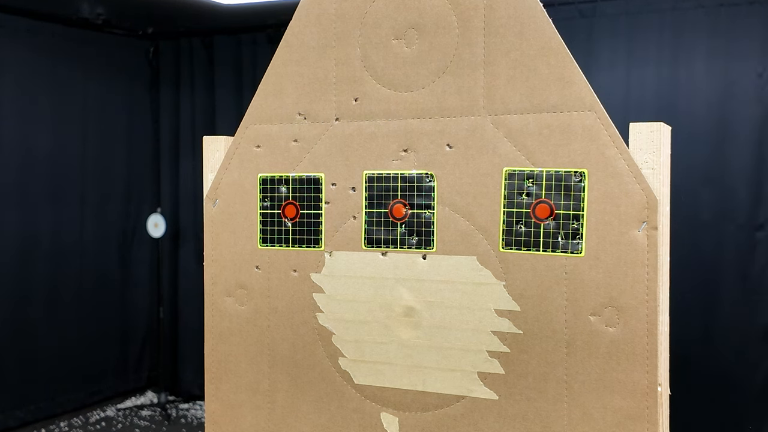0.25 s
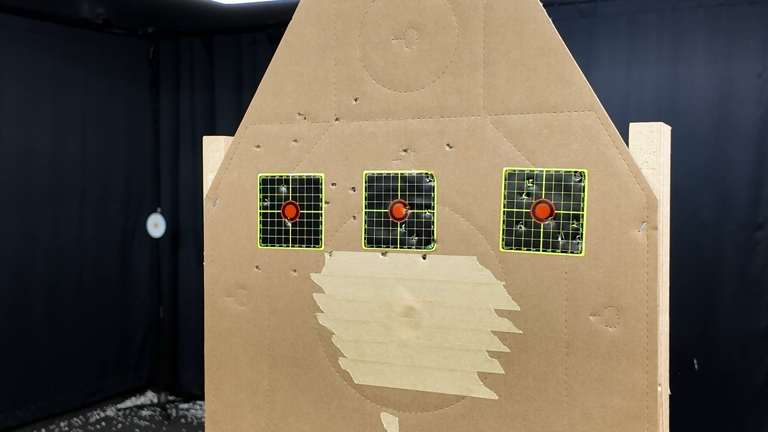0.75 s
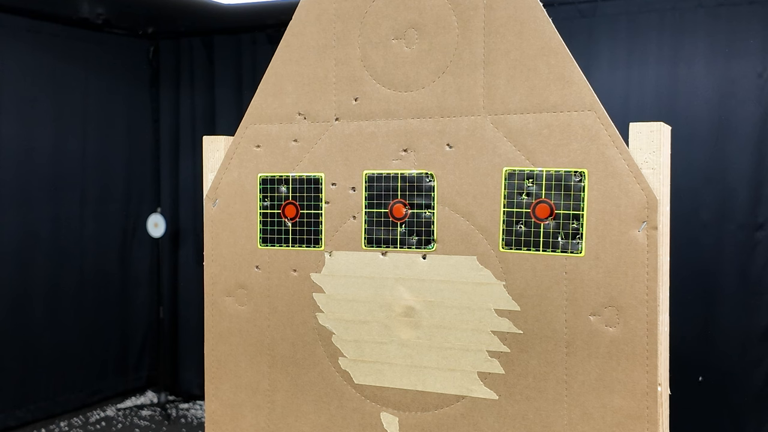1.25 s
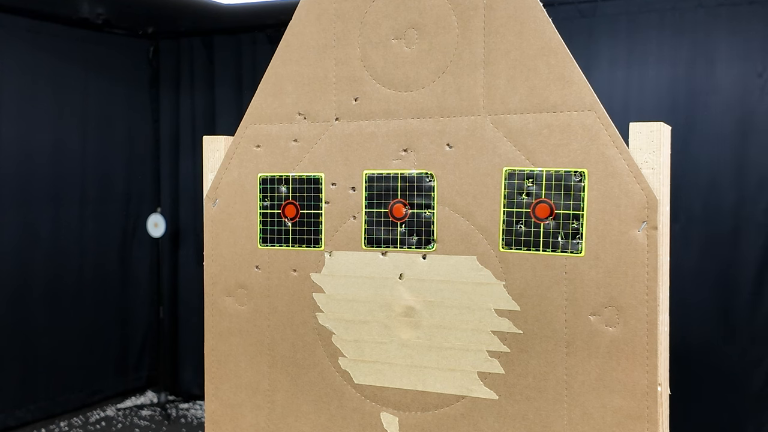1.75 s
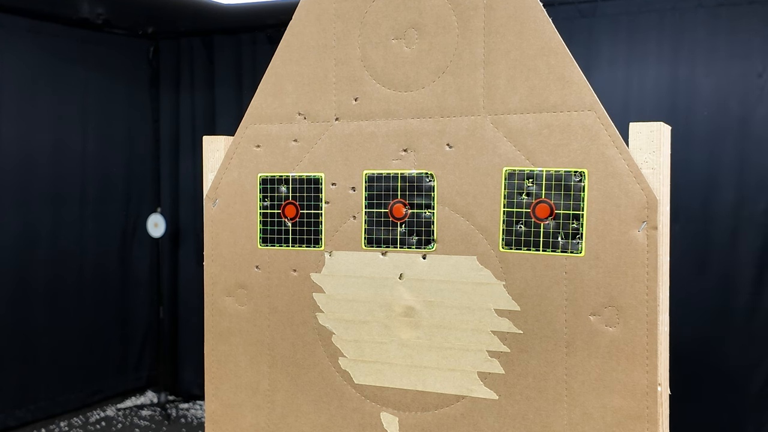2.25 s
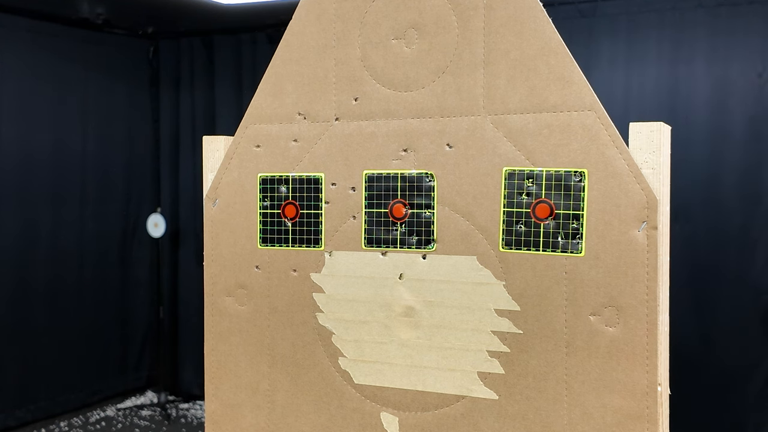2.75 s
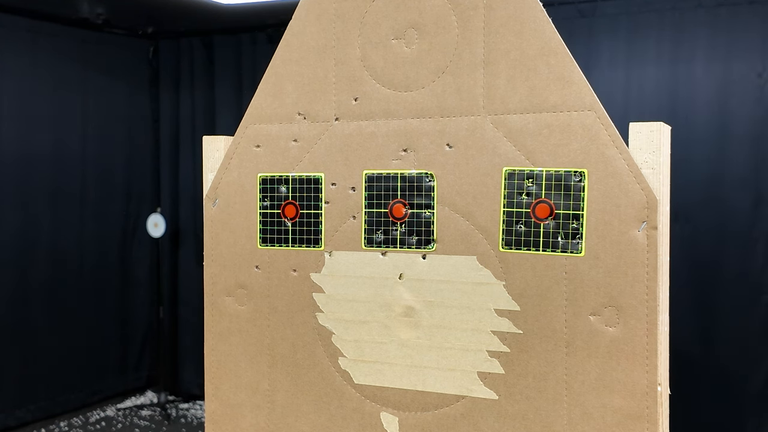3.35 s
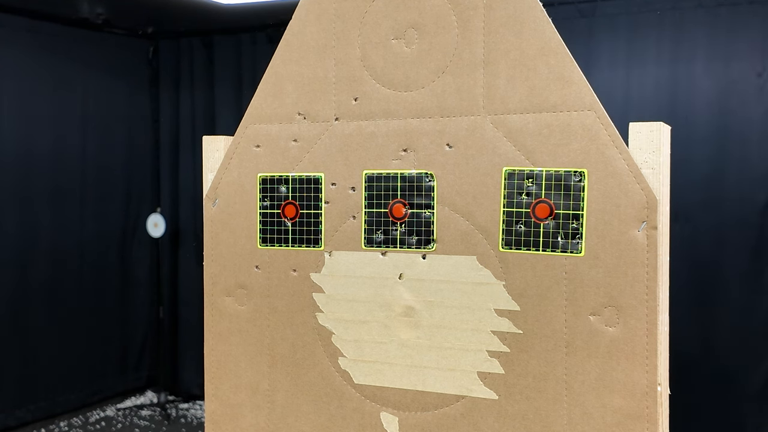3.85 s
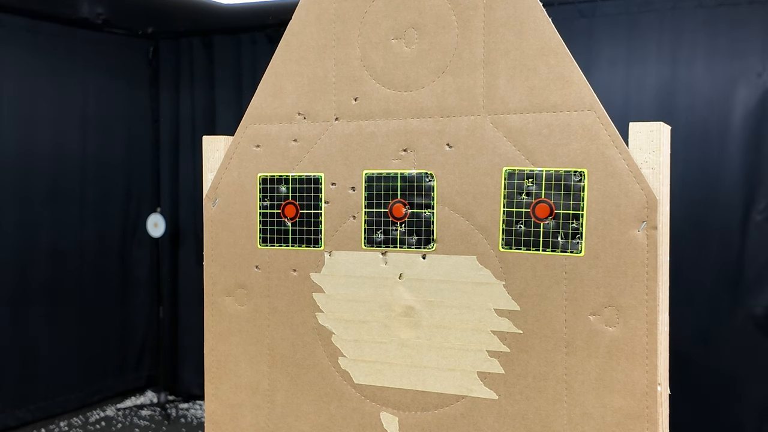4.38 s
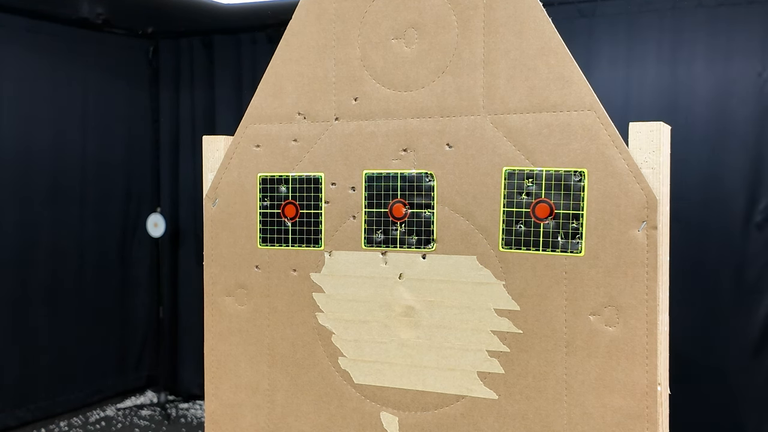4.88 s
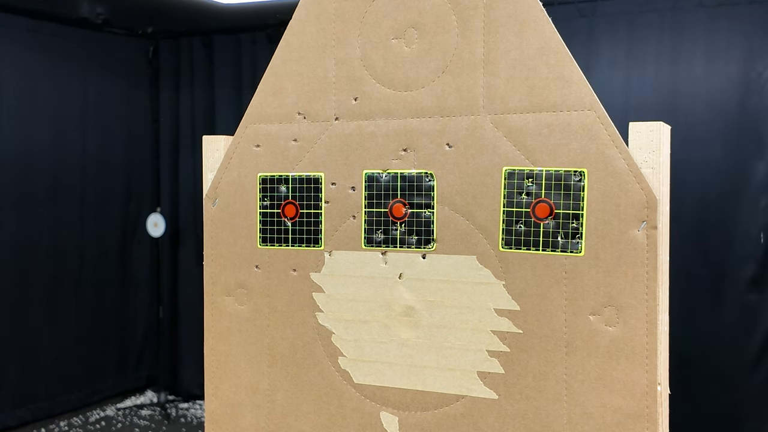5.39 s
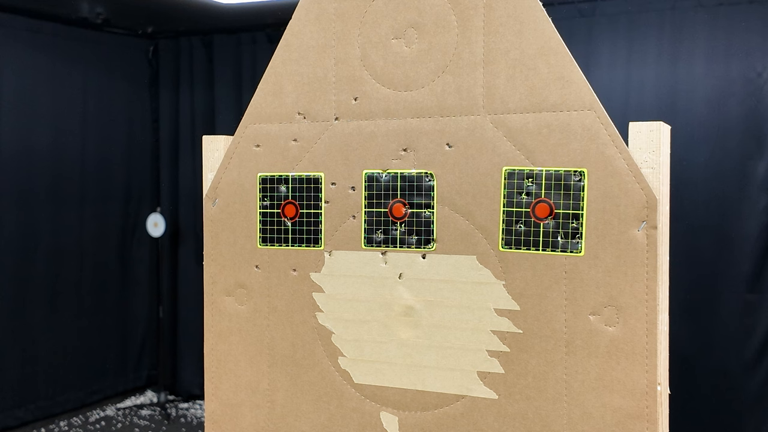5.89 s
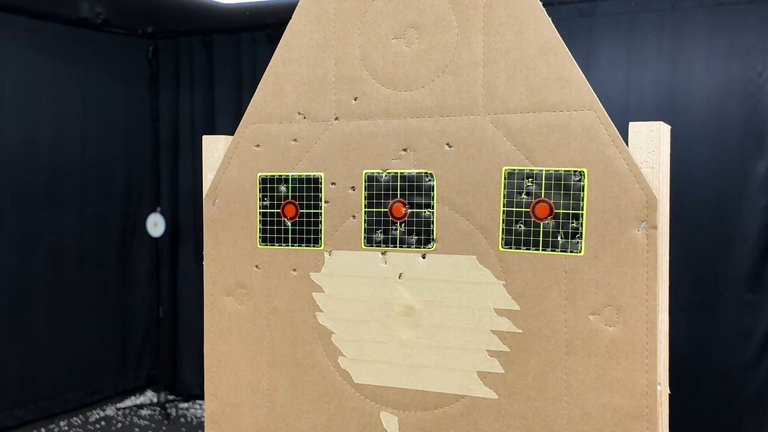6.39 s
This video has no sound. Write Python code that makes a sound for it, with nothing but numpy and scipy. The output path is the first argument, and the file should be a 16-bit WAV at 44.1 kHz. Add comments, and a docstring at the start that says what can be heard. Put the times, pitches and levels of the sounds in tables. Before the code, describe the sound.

A low, gently wavering ventilation rumble with faint hum fills a small curtained range. After a barely audible trigger tick, a gas blowback airsoft pistol fires at about 0.44 seconds, then at 1.4, 2.3, 3.2, 4.1 and 5.0. Each shot is a loud, clipped crack and gas pop, with the metal slide clacking back and home within a twentieth of a second, a short hiss and spring buzz. About a tenth of a second after each shot a pellet slaps cardboard with a hollow thump, the first the loudest, and the room answers briefly. Soft cloth pats follow at about 1.6, 2.6, 4.4 and 5.3. Crisp trigger resets click at roughly 0.8, 1.8, 2.65, 3.6, 4.5 and, more quietly, 5.5. A very faint spring twang precedes the fifth shot. On the sixth the slide locks open with a bouncing metallic clack; then only the rumble remains until about 6.5.

```python
"""A small curtained range, where a gas blowback airsoft pistol fires six shots at a cardboard target.
Each shot is a hammer blow, a pop of gas and the slide clacking back and home, built from coloured
bursts and ringing modes; a tenth of a second later the pellet slaps the cardboard. Gas pressure ties
the slide's pace to the pellet's speed. The trigger clicks after each shot, the slide locks open on the
last one, and the close microphone overloads over a low ventilation rumble of shaped noise and hum."""
import sys
import numpy as np
from scipy import signal
from scipy.fft import rfft, irfft
from scipy.io import wavfile

SR = 44100
rng = np.random.default_rng(int(sys.argv[2]) if len(sys.argv) > 2 else 0)


def master(y):
    """Save y as 16-bit WAV."""
    cut = np.clip(np.atleast_2d(y).T, -1, 1)
    pcm = np.round(cut * 32767)  # scale
    wavfile.write(sys.argv[1], SR, pcm.astype(np.int16))


N = 292383  # length in samples

# The shots. Each row: hammer strike in seconds, pellet speed in m/s, level of its slap on the
# cardboard in dB, lead of the trigger take-up before the strike in seconds.
SHOTS = [(0.4449, 81.5, -1.5, 0.056), (1.4033, 81.7, -9.5, 0.055), (2.315, 83.7, -6.5, .060),
         (3.2052, 82.8, -5, 0.1), (4.1409, 80.2, -6.5, .125), (4.9802, 81.8, -5, .064)]
# Pellets that go through and are stopped by the back curtain. Each row: start in seconds, level in dB.
CURTAIN_HITS = [(1.6348, -35.5), (2.5555, -30.5), (4.381, -36.5), (5.2613, -36)]
# The trigger snapping back into reset. Each row: start in seconds, level in dB, time to rest in seconds.
TRIGGER_RESETS = [(0.7944, -3.5, 0.13), (1.8043, -5.5, 0.11), (2.6506, -4.5, .128), (3.5762, -4, 0.12),
                  (4.4805, -5.5, .116), (5.5069, -10.5, 0.044)]

# Modes of the trigger linkage. Each row: frequency in Hz, level in dB, t60 in seconds.
TRIGGER_MODES = [(1954, 2, .012), (2480, -3, .008), (2750, -6, .007), (3375, -9, .008), (5173, -17, .006),
                 (6961, -18, .005), (8102, -19, .005)]
# Modes of slide and frame, with the faint long ring of the steel parts.
# Each row: frequency in Hz, level in dB, t60 in seconds.
PISTOL_MODES = [(2116, -2, .03), (2430, 0, .03), (2790, 0, .028), (3130, -1, .028), (3600, -2, .028),
                (5150, -13, .035), (7110, -9, .035), (8100, -13, .03), (9800, -14, .03), (2525, -22, .18),
                (6621, -28, .16), (6891, -24, .1), (8554, -33, .16), (12310, -26, .06)]
# Modes of the plucked trigger spring. Each row: frequency in Hz, level in dB, t60 in seconds.
PLUCK_MODES = [(1437, 0, .8), (2708, -3, .8), (3741, -9, .7), (4221, -14, .7)]

# Colour of the hammer on the gas valve. Each row: frequency in Hz, relative level in dB.
HAMMER_COLOUR = [(30, -25), (140, -10), (450, 3), (800, 7), (1250, 2), (1900, 1.5), (2700, 3), (3800, -8.5),
                 (5400, -21.5), (7500, -18), (11000, -34), (16000, -25.5)]
# Colour of the gas popping from the muzzle. Each row: frequency in Hz, relative level in dB.
MUZZLE_COLOUR = [(30, -35), (130, -14.5), (280, 0.5), (450, 0.5), (800, -5), (1300, -18.5), (2700, -6.5),
                 (4000, -20.5), (8000, -24), (16000, -43)]
# Colour of the slide meeting the frame. Each row: frequency in Hz, relative level in dB.
SLIDE_COLOUR = [(30, -28.5), (150, -10.5), (400, -7.5), (1200, -23.5), (1900, 1.5), (2800, 4.5),
                (3700, -2.5), (4400, -16), (5800, -17.5), (7300, -10.5), (9800, -14), (11500, -32.5),
                (16000, -30)]
# Colour of gas venting from the blowback chamber. Each row: frequency in Hz, relative level in dB.
VENT_COLOUR = [(60, -28), (200, -3.5), (500, -1), (1200, 3.5), (2800, -6), (4000, -6), (9000, -25),
               (16000, -29.5)]
# Colour of the recoil spring's buzz. Each row: frequency in Hz, relative level in dB.
SPRING_COLOUR = [(2000, -20), (4000, -9), (5000, 1), (6000, -5.5), (7200, 3), (10000, -10.5), (16000, -25)]
# Colour of the cardboard's thump. Each row: frequency in Hz, relative level in dB.
CARDBOARD_COLOUR = [(30, -32.5), (130, -25), (270, -10.5), (430, -1), (700, -1.5), (1150, -4.5),
                    (1900, -11), (2700, -10), (4000, -20.5), (6000, -28.5), (10000, -43.5), (16000, -42.5)]
# Colour of a dull slap of a pellet on cloth. Each row: frequency in Hz, relative level in dB.
CURTAIN_COLOUR = [(60, -27.5), (250, 10.5), (700, 13.5), (1300, -0.5), (3000, -13.5), (8000, -43.5),
                  (16000, -49)]
# Colour of a small bright snap. Each row: frequency in Hz, relative level in dB.
SNAP_COLOUR = [(800, -32), (1900, 5), (2600, -6.5), (4200, -2.5), (6000, -10), (10000, -21), (16000, -26)]

# First reflections of the pistol and trigger. Each row: delay in seconds, level in dB.
NEAR_ECHOES = [(.0075, -21.5), (.0092, -17), (0.0164, -21)]
# First reflections of the target and curtain. Each row: delay in seconds, level in dB.
FAR_ECHOES = [(.0018, -10), (.0073, -20.5), (0.0121, -7.5), (0.023, -11.5), (.028, -9)]
# Colour of the range's reverberation. Each row: frequency in Hz, relative level in dB.
ROOM_COLOUR = [(60, -10.5), (130, 9.5), (280, 4), (480, 2), (750, -1), (1200, -3), (1800, -6), (2700, -7),
               (4000, -1.5), (8000, -5.5), (16000, -10)]
# Decay of the range's reverberation. Each row: frequency in Hz, t60 in seconds.
ROOM_T60 = [(60, 1.1), (130, 1.1), (280, .86), (500, .76), (1200, .66), (2000, .48), (4000, .36),
            (8000, .29), (16000, .23)]
# Colour of the ventilation's rush. Each row: frequency in Hz, relative density in dB per Hz.
AIR_COLOUR = [(24, -44), (40, -14), (69, -8), (112, 1), (159, -4), (209, -2), (276, -6), (402, -6),
              (646, -16), (1180, -26), (1520, -33), (3060, -40), (6020, -53), (14800, -56), (16000, -60)]
# The fan motor's hum. Each row: frequency in Hz, level in dB.
HUM = [(119.3, -52)]

AIR_DB = -41.5
TARGET_M, SOUND_M_S, USUAL_SPEED_M_S = 7, 343, 82.2
# The slide's trip back and home at usual gas pressure, and the share of it spent going back.
CYCLE_S, BACK_SHARE = .0505, .405
SHOT_DB, HOME_DB = 2.5, -5
# On the empty magazine the catch stops the slide just after its rear stop; it bounces once, louder.
CATCH_S, BOUNCE_S = .0016, .009
CATCH_DB, BOUNCE_DB = -9, 4
# Light trigger ticks: taken up, and coming to rest after a release of the usual length.
TAKE_UP_DB, REST_DB, USUAL_RELEASE_S = -42, -41, 0.1
TOUCH_S = .04  # the finger first touches the trigger
PLUCK_S, PLUCK_DB = 4.016, -63  # once, the take-up plucks the trigger spring


def pistol():
    """The firing cycle: hammer, gas, slide back, then slide home or, on the last shot, locked open."""
    out = np.zeros(N)

    def clack(at, db, t60):
        """Slide meets frame: a crack and the ring of both."""
        add(out, at, undb(db) * blow(SLIDE_COLOUR, t60, grit_db=15.5))
        add(out, at, undb(db - 50) * ring(PISTOL_MODES, scatter_db=6.5))

    def fire(at, db):
        """The hammer falls on the valve and the gas pops."""
        clack(at - .008, db - 7.5, t60=.03)  # the sear slips
        clack(at - .005, db + 5.5, t60=0.027)  # the hammer swings, rattling harder as it goes
        clack(at - .002, db + 16, t60=0.011)
        add(out, at, undb(db + 31.5) * blow(HAMMER_COLOUR, t60=0.019, grit_db=12.0))
        # gas follows the pellet out
        add(out, at + .0105, undb(db + 41.0) * blow(MUZZLE_COLOUR, t60=0.012, grit_db=-3.5))

    def slide_back(at, db):
        """The slide bottoms the spring, then hits its stop, while the blowback chamber vents."""
        for lag in (-.003, .0005):
            clack(at + lag, db + 20.5, t60=0.041)
        add(out, at, undb(db + 17.5) * blow(VENT_COLOUR, t60=0.16, grit_db=15.5))

    def slide_home(at, db):
        """The spring drives the slide shut and buzzes on."""
        clack(at - .013, db + 17.5, t60=0.011)  # it strips the next pellet from the magazine
        for lag in (.0005, .005):  # it picks up the barrel, then seats
            clack(at + lag, db + 31.5, t60=0.01)
        add(out, at + .005, undb(db + 21) * blow(SPRING_COLOUR, t60=.11, grit_db=24))

    def slide_catch(at, db):
        """The slide strikes its catch and, being open, rings freely."""
        clack(at, db + 19, t60=0.019)
        add(out, at, undb(db - 11.5) * ring(PISTOL_MODES, scatter_db=5.5))

    for number, (at, speed, _, _) in enumerate(SHOTS, 1):
        pressure = (speed / USUAL_SPEED_M_S) ** 2  # relative to the usual gas pressure
        cycle = CYCLE_S / pressure
        rear = at + BACK_SHARE * cycle
        fire(at, SHOT_DB)
        slide_back(rear, SHOT_DB)
        if number < len(SHOTS):
            slide_home(at + cycle, HOME_DB)
        else:
            caught = rear + CATCH_S
            slide_catch(caught, CATCH_DB)
            slide_catch(caught + BOUNCE_S, CATCH_DB + BOUNCE_DB)
    return room(out, NEAR_ECHOES, wet_db=-12, build_s=.026)


def pellets():
    """Pellets slap the cardboard, some then the curtain; both are far enough to fill the room."""
    out = np.zeros(N)
    for fired, speed, db, _ in SHOTS:
        flight = TARGET_M / speed
        sound_return = TARGET_M / SOUND_M_S
        at = fired + flight + sound_return
        tear = blow(SNAP_COLOUR, t60=0.0089, grit_db=5)
        thump = -blow(CARDBOARD_COLOUR, t60=0.037, grit_db=-4.5)
        add(out, at + .001, undb(db + 9) * tear)
        add(out, at + 0.0017, undb(db + 40) * thump)
    for at, db in CURTAIN_HITS:
        add(out, at, undb(db + 41.5) * blow(CURTAIN_COLOUR, t60=0.055, grit_db=12.0))
    return room(out, FAR_ECHOES, wet_db=-3.5, build_s=0.012)


def trigger():
    """Small clicks by the microphone: bright snaps carry into the room, the linkage's ring hardly does."""
    snaps, rings = np.zeros(N), np.zeros(N)
    upper_modes = TRIGGER_MODES[1:]

    def snap():
        """A clean, hard contact."""
        return blow(SNAP_COLOUR, t60=.004, grit_db=-3)

    add(rings, TOUCH_S, undb(REST_DB) * ring(upper_modes, scatter_db=5.5))
    for fired, _, _, lead in SHOTS:
        add(rings, fired - lead, undb(TAKE_UP_DB) * ring(TRIGGER_MODES, scatter_db=1.5))
    for at, db, release in TRIGGER_RESETS:
        add(snaps, at, undb(db - 2) * snap())  # the bar slips off the sear, then lands
        add(snaps, at + 0.000991, undb(db + 12.0) * snap())
        add(rings, at + 0.0009965, undb(db - 10.0) * ring(TRIGGER_MODES, scatter_db=4.5))
        # the quicker the release, the harder the trigger meets its rest, which damps the lowest mode
        force = USUAL_RELEASE_S / release
        add(rings, at + release, undb(REST_DB) * force * ring(upper_modes, scatter_db=-6))
    clicks = room(snaps, NEAR_ECHOES, wet_db=-15, build_s=0.012)
    clicks = clicks + room(rings, NEAR_ECHOES, wet_db=-23.5, build_s=.012)
    out = high_pass(clicks, hz=1500, order=8)
    add(out, PLUCK_S, undb(PLUCK_DB) * ring(PLUCK_MODES, scatter_db=1.5))
    return out


def ventilation():
    """A low, gently swelling rush of air (shaped noise) with a wavering motor hum (sine)."""
    t = np.arange(N) / SR

    def walk(count):
        """Smooth chance with a spread near one, through a number of random points."""
        return signal.resample(rng.standard_normal(count), N)

    density_db = on_log_axis(np.fft.rfftfreq(N, 1 / SR), *np.transpose(AIR_COLOUR))
    air = irfft(rfft(rng.standard_normal(N)) * undb(density_db), N)
    air_level = undb(AIR_DB + 2.0 * walk(count=40))
    hum = 0
    for hz, db in HUM:
        level = np.sqrt(2) * undb(db + 2 * walk(count=30))
        hum = hum + level * np.sin(2 * np.pi * hz * t + 0.2 * walk(count=30))
    return air / np.std(air) * air_level + hum


def room(sound, echoes, wet_db, build_s):
    """Direct sound, first reflections and a diffuse tail whose treble the curtains soak up."""
    t = seconds(1.3)
    bins = np.fft.rfftfreq(len(t), 1 / SR)
    colour_db = on_log_axis(bins, *np.transpose(ROOM_COLOUR))
    noise = rfft(rng.standard_normal(len(t))) * undb(wet_db + colour_db)
    centres = np.geomspace(60, 16000, 17)  # overlapping bands in Hz, each with its own decay
    tail = 0
    for share, t60 in zip(np.eye(len(centres)), on_log_axis(centres, *np.transpose(ROOM_T60))):
        band = irfft(noise * on_log_axis(bins, centres, share), len(t))
        build_up = 1 - np.exp(-(t / build_s) ** 2)  # the range takes time to fill with sound
        envelope = fade(t, t60) * build_up
        tail = tail + band * envelope / np.linalg.norm(envelope)
    tail[0] += 1  # direct sound
    for delay, echo_db in echoes:
        # the longer its path, the more a reflection is scattered by folds and edges
        scatter = rng.standard_normal(1024) * fade(t[:1024], delay / 2)
        scatter[0] += 9
        add(tail, delay, undb(echo_db) * scatter / np.linalg.norm(scatter))
    return signal.fftconvolve(sound, tail)[:N]


def blow(colour, t60, grit_db):
    """A pressure pulse and a dying burst of turbulence or rattle, through one colour."""
    t = seconds(.15)
    burst = rng.standard_normal(len(t)) * fade(t, t60)
    burst *= undb(grit_db) / np.linalg.norm(burst)  # burst level against the pulse
    burst[0] += 1
    return signal.fftconvolve(burst / np.linalg.norm(burst), response(colour))


def ring(modes, scatter_db):
    """Decaying modes; every contact excites them a little differently."""
    t = seconds(.3)
    hz, db, t60 = np.transpose(modes)[:, :, None]
    chance = rng.standard_normal((len(modes), 2))
    detuned_hz = hz * (1 + 0.0016 * chance[:, :1])
    level = undb(db + scatter_db * chance[:, 1:])
    return np.sum(level * np.sin(2 * np.pi * detuned_hz * t) * fade(t, t60), axis=0)


def response(colour, size=4096):
    """Causal impulse response of a (Hz, dB) colour, from its cepstrum."""
    db = on_log_axis(np.fft.rfftfreq(size, 1 / SR), *np.transpose(colour))
    cepstrum = irfft(np.log(undb(db)))
    cepstrum[1:size // 2] *= 2  # fold onto positive time for minimum phase
    cepstrum[size // 2 + 1:] = 0
    return irfft(np.exp(rfft(cepstrum)))[:size // 2]


def high_pass(sound, hz, order):
    """Take away what lies below a frequency."""
    return signal.sosfilt(signal.butter(order, hz, "high", fs=SR, output="sos"), sound)


def fade(t, t60):
    """Exponential decay that loses 60 dB in t60 seconds."""
    return np.exp(-np.log(1000) * t / t60)


def on_log_axis(hz, points, values):
    """Join spectrum points by straight lines over log frequency."""
    return np.interp(np.log(np.maximum(hz, 1)), np.log(points), values)


def undb(db):
    """Decibels to gain."""
    return 10 ** (np.asarray(db) / 20)


def seconds(length):
    """Time axis of a given length in seconds."""
    return np.arange(int(length * SR)) / SR


def add(track, at, sound):
    """Mix a sound into a track at a time in seconds."""
    i = int(round(at * SR))
    track[i:i + len(sound)] += sound[:N - i]


def scene():
    """Pistol, pellets, trigger and room air at one microphone."""
    return (pistol() + pellets() + trigger() + ventilation())[None]


def record(dry):
    """Peaks clip flat at full scale; the recorder sheds the deepest bass and cuts the top steeply."""
    thinned = high_pass(np.clip(dry, -1, 1), hz=56, order=2)
    steep_low_pass = signal.ellip(8, .2, 60, 15800, fs=SR, output="sos")  # edge in Hz
    return signal.sosfilt(steep_low_pass, thinned)


dry = scene()
out = record(dry)
master(out)
```